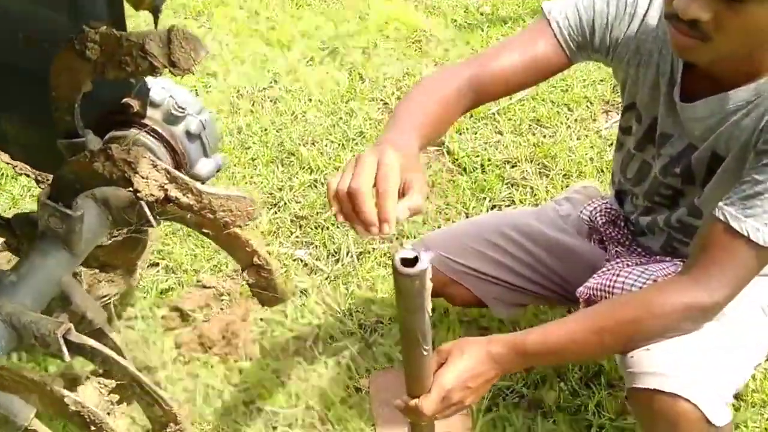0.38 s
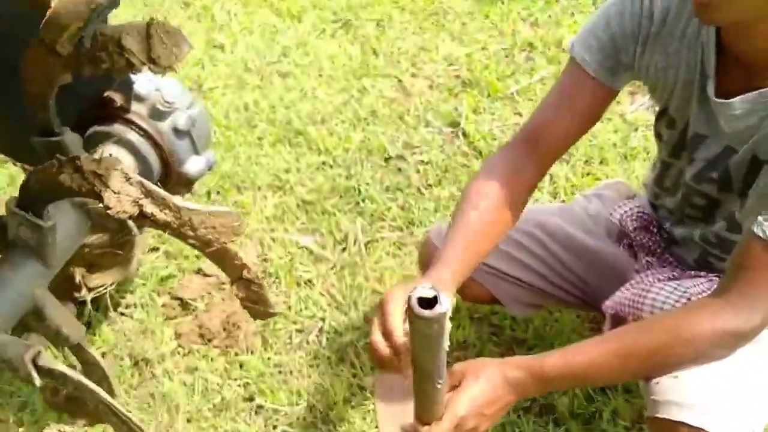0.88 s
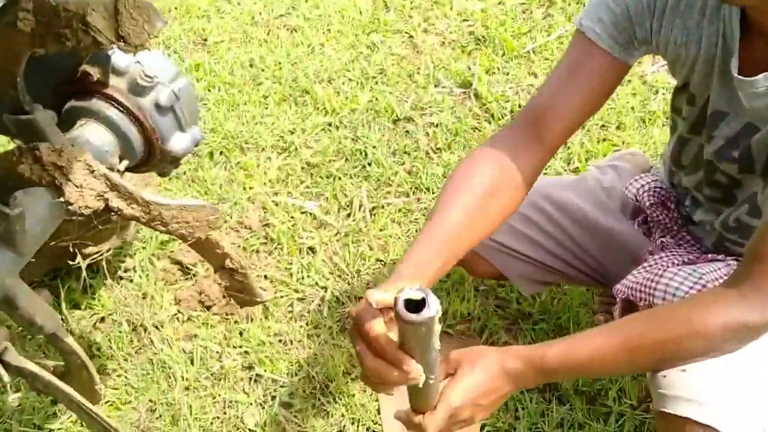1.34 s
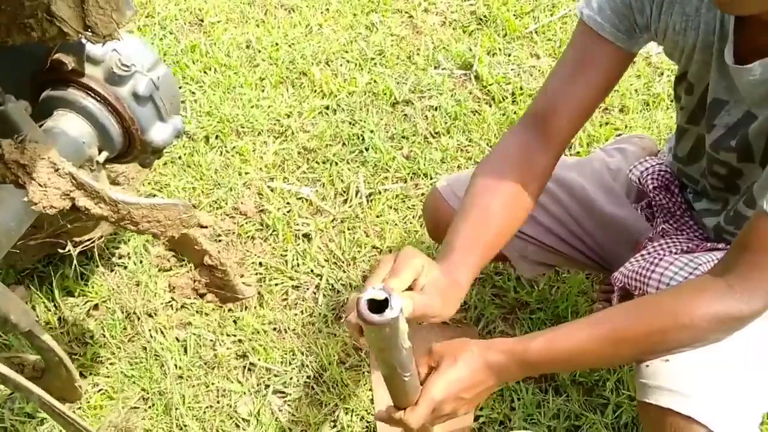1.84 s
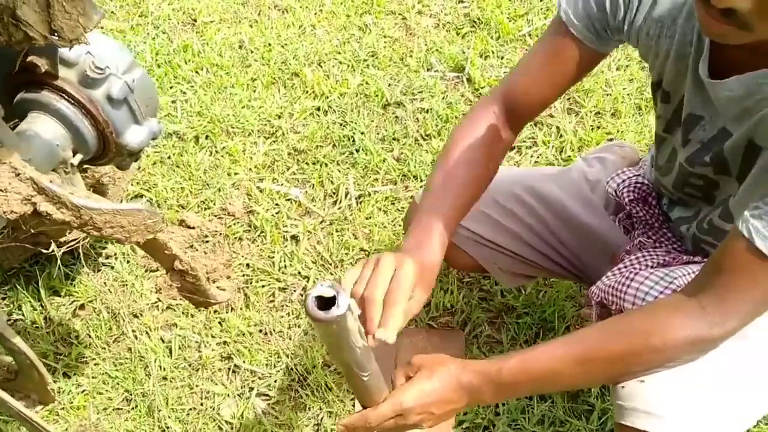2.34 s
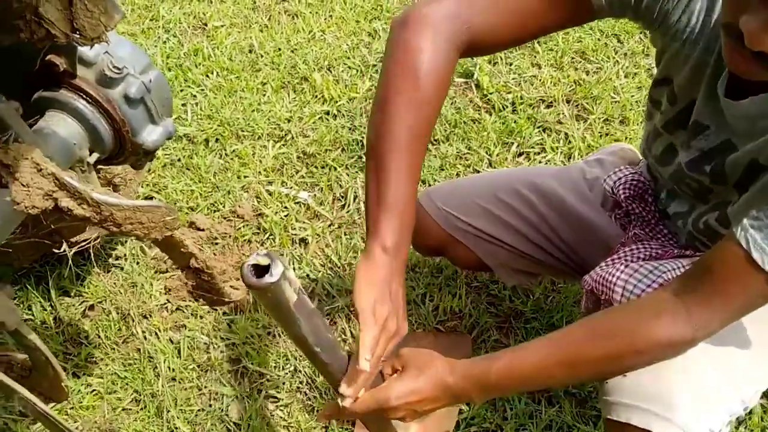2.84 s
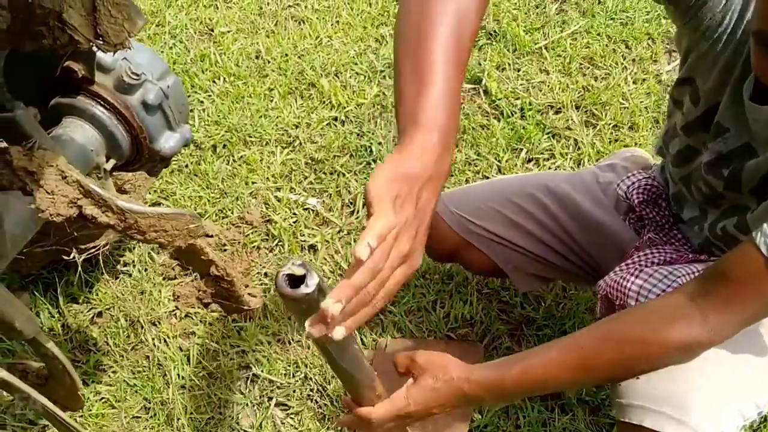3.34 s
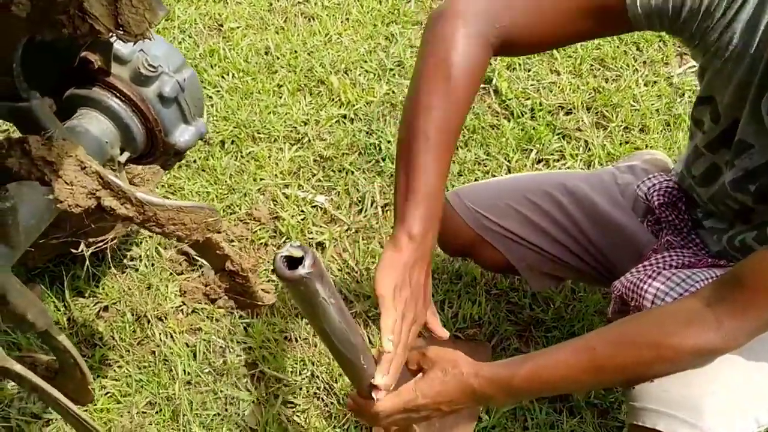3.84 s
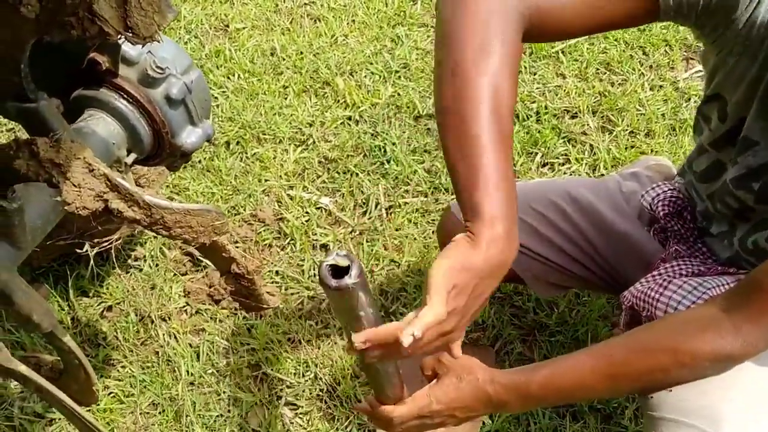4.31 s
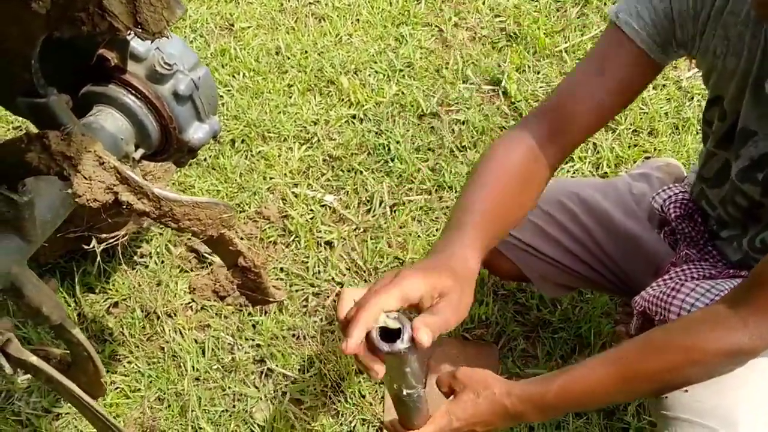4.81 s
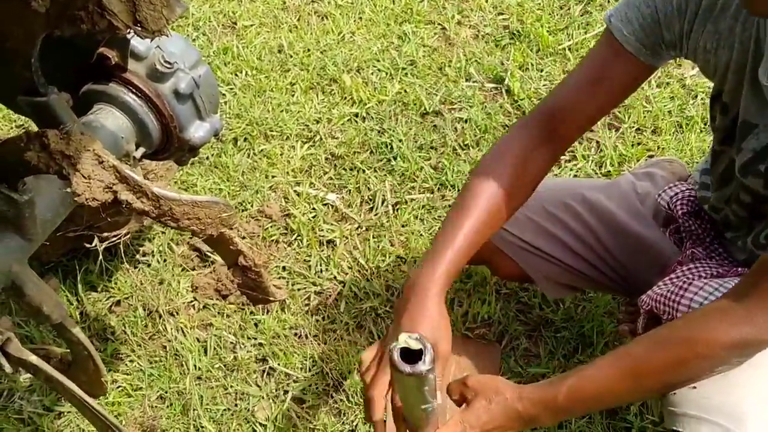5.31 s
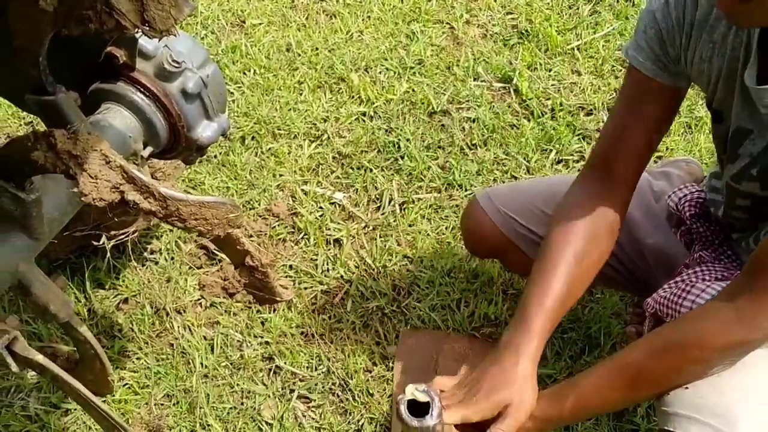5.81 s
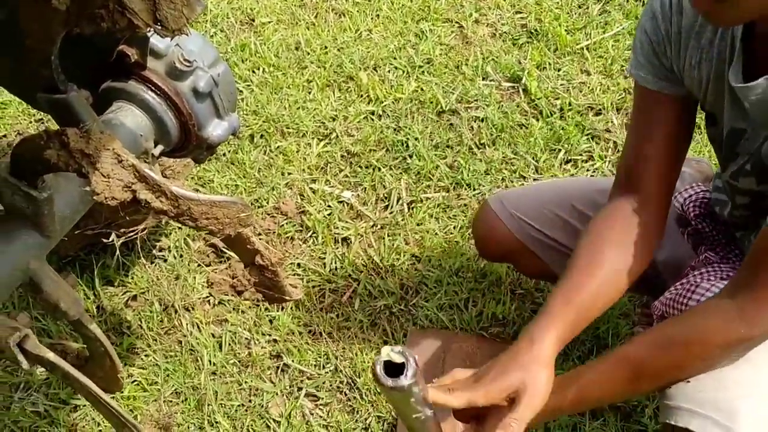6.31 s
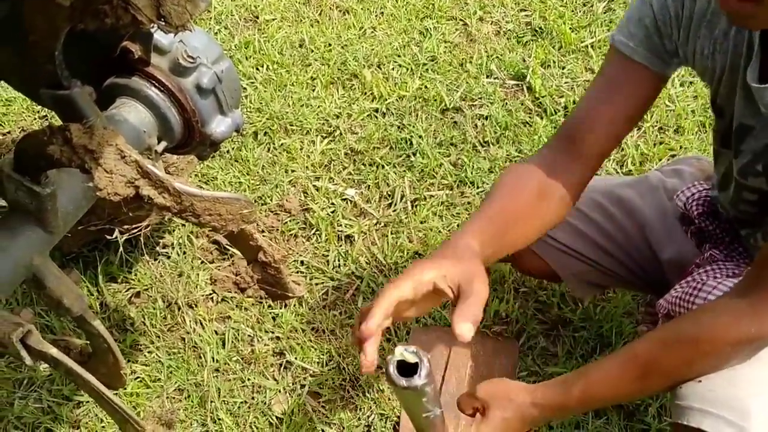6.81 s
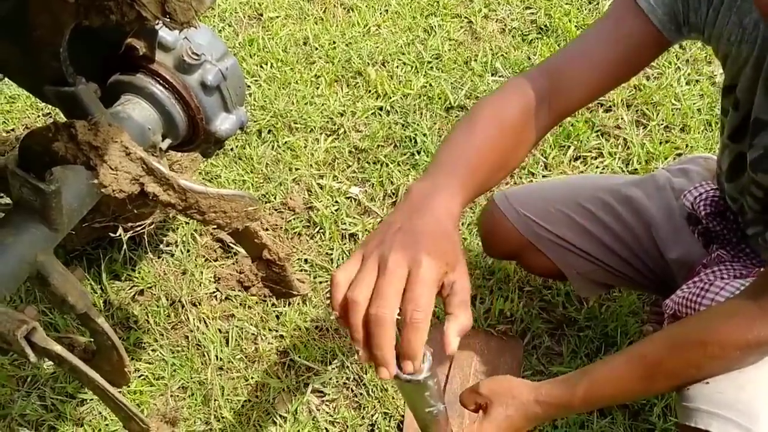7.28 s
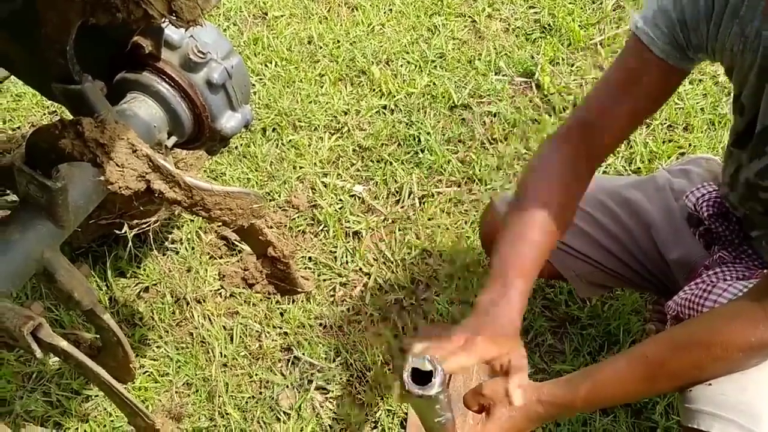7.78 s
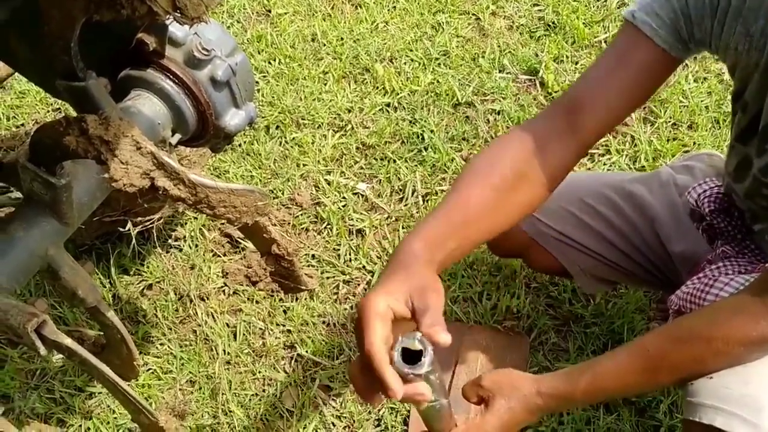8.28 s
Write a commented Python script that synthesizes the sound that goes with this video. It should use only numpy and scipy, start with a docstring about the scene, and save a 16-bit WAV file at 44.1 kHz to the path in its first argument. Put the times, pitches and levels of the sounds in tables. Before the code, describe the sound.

Close outdoor microphone, quiet air with slight low rumble and no room echo. Hand strokes rasp along a steel pipe, hollow and ringing in the middle range, about two per second at first. Several hard, thumping knocks arrive in quick succession just after two seconds, then the scraping softens, pauses and returns late. Triple cricket chirps, around seven kilohertz, continue throughout and grow slightly louder, with soft rustles and faint bird calls.

```python
"""Crickets and a scraped pipe

Outdoors on grass, crickets chirp in threes as gliding near-sines, over a far chorus of scattered strokes,
a buzzing insect of falling pulses and filtered noise for air, low rumble and rustling grass. Friction noise
rings the resonances of a steel pipe scraped in strokes. A few dull knocks close by are snaps and sinking
thumps, ticks are resonant bursts, and a far bird's whistles and faint hoots are sines that fall onto a note."""
import sys
import numpy as np
from scipy import signal
from scipy.io import wavfile
from scipy.ndimage import uniform_filter1d

SR = 44100
rng = np.random.default_rng(int(sys.argv[2]) if len(sys.argv) > 2 else 0)


def natural_amplitude(level_db):
    """Convert a level in decibels to a linear amplitude factor, elementwise."""
    exponent = np.asarray(level_db, float) / 20
    return 10 ** exponent


def log_audio(samples):
    """Write samples as a 16-bit WAV file to the path given in sys.argv[1]."""
    # one column per channel
    frames = np.atleast_2d(samples).T
    # limit to full scale, then quantise
    limited = np.clip(frames, -1, 1)
    pcm = np.round(limited * 32767).astype(np.int16)
    wavfile.write(sys.argv[1], SR, pcm)


N = 381465  # length in samples

# Steady air. Each row: frequency in Hz, relative density in dB per Hz.
AIR_COLOUR = [(30, -30), (79, -12), (115, -0.5), (300, -3.5), (684, -11), (1500, -12.5), (2750, -10),
              (3700, -16.5), (4400, -26), (5600, -16.5), (7100, -13), (10800, -29.5), (13400, -27.5),
              (14400, -36), (16000, -42)]
AIR_DB = -58.5  # rms before the bass cut
# Low rumble. Each row: time in seconds, rms before the bass cut in dB.
RUMBLE_LEVEL = [(0, -65), (0.7, -62.5), (2.3, -61.5), (2.46, -52), (2.6, -59), (3.3, -63.5), (4.17, -66),
                (4.41, -63), (7.7, -63.5), (8, -60.5), (8.65, -60.5)]
# One wing stroke, before tuning and stretching.
# Each row: time from its peak in ms, pitch in Hz, height from 0 to 1.
WING_STROKE = [(-6.5, 7400, 0), (-3.5, 7350, 0.32), (-3, 7320, 0.59), (0.5, 7250, 0.96), (2.5, 6980, 0.7),
               (4.8, 6750, 0.6), (6, 6500, 0.14), (9.5, 6150, 0.02)]
# Far crickets, too many to count. Each row: time in seconds, rms in dB.
CHORUS_LEVEL = [(0, -58), (0.8, -60), (1.54, -58), (1.88, -62), (2.1, -58), (2.4, -62), (2.96, -57.5),
                (3.25, -62), (3.42, -56), (3.64, -60), (5.5, -60), (6.24, -55), (6.7, -59), (6.94, -57),
                (7.3, -60), (8.1, -54.5), (8.43, -58), (8.65, -54)]
# The nearest cricket, three wing strokes a chirp. Each row: time of the last stroke in seconds,
# its peak in dB, time of the opening stroke in seconds, its peak in dB.
NEAR_CHIRPS = [(0.236, -35, 0.1793, -38), (0.705, -35, 0.6471, -40), (1.102, -34, 1.0515, -44),
               (1.5117, -35, 1.4515, -41), (1.9927, -31, 1.936, -35), (2.458, -33.5, 2.4117, -44.5),
               (2.91, -34.5, 2.853, -37.5), (3.4086, -32, 3.351, -35), (3.8809, -33, 3.825, -37.5),
               (4.3444, -33, 4.2882, -37.5), (4.822, -32, 4.7647, -38.5), (5.2254, -31, 5.168, -36.5),
               (5.6833, -32, 5.6257, -37.5), (6.1444, -31, 6.089, -38), (6.6139, -28.5, 6.5574, -33),
               (7.0707, -30.5, 7.0165, -36), (7.5358, -29.5, 7.4793, -34), (7.9877, -28, 7.932, -35),
               (8.4227, -29.5, 8.3658, -35)]
STROKE_GAP_S, MIDDLE_DB = .0292, -.8  # the middle stroke: its lead on the last, its level relative to it
# Single strokes of neighbouring crickets that stand out. Each row: time in seconds, peak in dB.
NEIGHBOUR_STROKES = [(0.046, -46), (0.274, -45), (0.7236, -45), (0.8188, -47), (1.155, -47), (1.687, -46),
                     (2.3394, -43.5), (2.5797, -44.5), (2.6767, -46), (3.0771, -44.5), (3.265, -45),
                     (3.5487, -45), (3.9191, -41), (3.9543, -44.5), (4.271, -46), (4.6774, -45),
                     (4.9887, -45), (5.0035, -44.5), (5.2453, -39), (5.2845, -45), (5.5772, -46.5),
                     (5.7574, -46.5), (5.949, -45), (5.9797, -44.5), (6.3305, -43), (6.363, -44),
                     (6.3929, -46.5), (6.4712, -44.5), (6.6766, -44.5), (6.6907, -42), (6.7173, -44),
                     (6.888, -45), (7.3914, -47), (7.426, -46), (7.4569, -39.5), (7.5728, -45.5),
                     (7.8345, -45.5), (7.8645, -43), (7.9152, -44), (8.1909, -41), (8.221, -36),
                     (8.4808, -46), (8.5001, -40.5), (8.5326, -40.5), (8.5721, -44)]
# Scraping strokes on the pipe. Each row: start in seconds, fastest moment in seconds, end in seconds,
# rms when fastest in dB, brightness when fastest in dB per 1500 Hz (upper over lower resonances).
SCRAPES = [(-0.08, 0.17, 0.3, -49, 5), (0.49, 0.72, 0.9, -47.5, 5), (1.03, 1.31, 1.5, -45.5, 4),
           (1.66, 1.97, 2.11, -48.5, 6), (2.17, 2.5, 2.74, -51, 5), (2.6, 3.06, 3.17, -54, 1),
           (3.2, 3.46, 3.58, -53.5, -1), (3.64, 3.92, 4.04, -52, 3), (4.13, 4.35, 4.43, -51.5, 1),
           (4.56, 4.77, 4.87, -53.5, 1), (4.93, 5.23, 5.32, -51.5, -1), (6.4, 6.63, 6.76, -50, 2),
           (7, 7.05, 7.11, -62, -3), (7.3, 7.54, 7.65, -50.5, 5), (7.8, 7.95, 8.01, -64, -10),
           (8.32, 8.59, 8.8, -47.5, 9)]
EDGE_DB, REST_DB = -23, -75  # level at a stroke's ends relative to its height, level between strokes
RISE_BEND, FALL_BEND = 1.9, 2.3  # exponents that curve a stroke's flanks
DULL_DB = -6  # brightness while the hand is still slow, dB per 1500 Hz
# Air column and wall of the pipe.
# Each row: resonance in Hz, width in Hz, relative level before tilting in dB.
PIPE_MODES = [(1850, 404, -7.5), (2170, 300, -3), (2644, 230, -1), (2930, 320, -5), (3395, 307, -1.5),
              (3800, 270, -16)]
# Hiss of grass and cloth. Each row: frequency in Hz, relative density in dB per Hz.
HISS_COLOUR = [(3500, -30), (4800, -12), (6000, -8), (8200, 3), (9600, -2.5), (10600, -14.5), (13000, -22),
               (16000, -35)]
# Crisper top of the rustling. Each row: frequency in Hz, relative density in dB per Hz.
CRISP_COLOUR = [(6000, -32), (8500, -11), (11500, -9), (13700, -5), (14300, 3), (15600, -2), (16200, -13)]
# Rustles of grass and cloth. Each row: time of its height in seconds, half length in seconds,
# rms of the hiss near 9 kHz in dB, rms of the crisper top in dB.
RUSTLE_SURGES = [(0.14, .08, -63, -75), (0.36, .05, -68, -78), (0.7, .08, -57, -67), (0.85, .04, -63, -79),
                 (1.17, .05, -70, -77), (1.58, .05, -70, -76), (1.98, .02, -64, -85),
                 (2.07, .015, -62, -68), (2.19, .03, -59, -67), (2.375, .02, -65, -63),
                 (2.5, .06, -63, -70), (2.68, .045, -56, -55), (2.8, .09, -62, -66), (2.91, .03, -60, -72),
                 (3.02, .07, -64, -67), (3.11, .03, -65, -71), (3.3, .03, -64, -67), (3.41, .06, -59, -67),
                 (4.04, .05, -66, -71), (4.21, .02, -66, -76), (4.31, .04, -65, -82), (4.82, .05, -63, -82),
                 (4.99, .05, -67, -73), (5.18, .03, -63, -78), (5.42, .1, -62, -67), (6.03, .05, -57, -66),
                 (6.25, .035, -59, -66), (6.63, .06, -61, -78), (6.82, .02, -70, -74),
                 (7.06, .03, -63, -85), (7.56, .07, -64, -79), (7.73, .04, -63, -81), (7.93, .05, -59, -78),
                 (8.45, .04, -64, -80), (8.6, .07, -64, -80)]
STIR_HISS_DB, STIR_CRISP_DB = -66, -77.5  # mid levels of grass stirring between the rustles
# Faint low hoots. Each row: start in seconds, length in seconds, nominal first pitch in Hz, level in dB.
HOOT_CALLS = [(0, .04, 990, -70), (.145, .1, 990, -69), (.268, .024, 1030, -66.5), (.41, .04, 1150, -68.5),
              (5.765, .02, 1420, -69), (5.785, .018, 1100, -66.5), (5.85, .04, 1130, -63.5),
              (5.925, .047, 1220, -62.5)]
# Shared fall of the hoots: resting note in Hz, fall in Hz per second, rounding in Hz.
HOOT_FALL = 990, 11000, 40
# Falling whistles of a far bird.
# Each row: start in seconds, length in seconds, nominal first pitch in Hz, level in dB.
WHISTLE_CALLS = [(3.81, .11, 2750, -61), (4.07, .135, 3850, -66), (4.25, .14, 2750, -61),
                 (4.495, .135, 3900, -65), (4.67, .135, 2900, -57.5)]
# Shared fall of the whistles: resting note in Hz, fall in Hz per second, rounding in Hz.
WHISTLE_FALL = 2060, 19500, 290
# Evenly spaced runs of a lower insect.
# Each row: first buzz in seconds, last buzz in seconds, reference level in dB.
BUZZES = [(0.097, 0.188, -64.5), (0.53, 0.969, -64), (1.489, 1.964, -62), (2.536, 2.995, -64),
          (3.485, 3.97, -64), (4.362, 4.748, -63.5), (5.255, 5.531, -63.5), (5.919, 6.011, -64.5),
          (6.622, 6.913, -63), (7.35, 7.615, -63.5), (8.134, 8.61, -63)]
BUZZ_GAP_S, BUZZ_SPREAD_DB = .093, 1.5  # approximate spacing, standard deviation from buzz to buzz
# Small ticks and chips.
# Each row: time in seconds, peak in dB, resonance in Hz, decay of the burst in ms.
TICK_BURSTS = [(.374, -49.5, 2580, 8.6), (2.0728, -40, 1210, 1.3), (2.207, -38, 1310, 1.5),
               (2.2132, -32, 1620, 1.5), (2.218, -36, 3260, 1.6), (2.6358, -37, 1280, 0.91),
               (3.1416, -38, 8400, 1.3), (3.1416, -46, 14000, .6), (5.012, -52, 2200, 9.7),
               (5.168, -42, 11000, .5), (2.6348, -42, 3000, .8)]
# Knocks. Each row: time in seconds, snap level in dB, snap width in ms, thump level in dB,
# last pitch of the thump in Hz.
KNOCK_BLOWS = [(1.436, -61.5, .3, -49.5, 150), (1.666, -46, 0.32, -40.5, 248),
               (2.0784, -16.5, 0.15, -21, 105), (2.1732, -11, .14, -18, 101),
               (2.1932, -15, .15, -20.5, 100), (2.2116, -17, 0.15, -19, 101), (2.323, -17, 0.16, -20, 110),
               (2.3854, -42, 0.14, -35, 140), (2.4671, -21, 0.2, -18, 111), (2.635, -38.5, 0.13, -41, 119)]


def evened(x):
    """Normalisation of a signal to rms 1."""
    return x / np.sqrt(np.mean(x ** 2) + 1e-20)


def curve(rows, t):
    """Linear interpolation of a table's columns at times t."""
    s, *columns = np.transpose(rows)
    return [np.interp(t, s, c) for c in columns]


def add(mix, s, sound):
    """Superposition of a sound on the mix from time s."""
    part = mix[max(round(s * SR), 0):][:len(sound)]
    part += sound[:len(part)]


def drift(size):
    """Twice-averaged noise: slow random variation of rms 1; size in samples."""
    return evened(uniform_filter1d(uniform_filter1d(rng.standard_normal(N), size), size))


def resonate(x, hz, width):
    """Heterodyne resonance of gain 1: shift the pitch curve hz to zero, smooth, and shift back."""
    turn = np.exp(2j * np.pi * np.cumsum(hz * np.ones(len(x))) / SR)
    r = np.exp(-np.pi * width / SR)
    return 2 * (turn * signal.lfilter([1 - r], [1, -r], x / turn)).real


def noise(points, patchy_db):
    """Coloured noise from random short-time spectra, with patches that drift over time and frequency."""
    frames, hz = N // 128 + 5, np.fft.rfftfreq(512, 1 / SR)
    a, b, patches = rng.standard_normal((frames, 257, 3)).T
    patches = evened(uniform_filter1d(uniform_filter1d(patches, 8, 0), 16, 1))
    f, db = np.transpose(points)
    colour = np.interp(np.log(hz + 1), np.log(f), db)[:, None]
    spectra = (a + 1j * b) * natural_amplitude(colour + patchy_db * patches)
    return evened(signal.istft(spectra, nperseg=512, noverlap=384)[1][:N])


def field(x, t60):
    """Scattering by grass and machinery: sparse echoes of random sign that fall 60 dB in t60 seconds."""
    at = np.arange(100, 8000, 20) + rng.integers(0, 20, 395)
    taps = np.zeros(8020)
    taps[at] = rng.choice([-1., 1.], 395) * natural_amplitude(-60 * at / SR / t60)
    return signal.oaconvolve(x, taps / np.linalg.norm(taps))[:N]


def air():
    """Broadband noise as steady air, and twice-resonated noise as a wavering low rumble."""
    low = resonate(resonate(rng.standard_normal(N), 114, 64), 137, 164)
    rumble = evened(low) * natural_amplitude(curve(RUMBLE_LEVEL, np.arange(N) / SR)[0])
    steady = natural_amplitude(AIR_DB) * noise(AIR_COLOUR, 1.53) + rumble
    # hardly any deep bass
    return signal.sosfilt(signal.butter(5, 74, "high", fs=SR, output="sos"), steady)


def stroke(tune, slow, lift_hz=0):
    """Frequency glide of one wing stroke: a near-sine swells and falls in pitch, a little uneven."""
    ms = np.arange(WING_STROKE[0][0], WING_STROKE[-1][0], 1000 / SR / slow)
    hz, height = curve(WING_STROKE, ms)
    uneven = 1 + .12 * evened(uniform_filter1d(rng.standard_normal(len(ms)), size=40))
    soft = uniform_filter1d(uniform_filter1d(height * uneven, size=20), size=20)
    turns = np.cumsum(tune * hz + lift_hz) / SR + rng.random()
    return soft * np.sin(2 * np.pi * turns)


def crickets():
    """Superposed wing strokes: near ones one by one, the chorus a dense random scatter blurred by echoes."""
    near, far = np.zeros(N), np.zeros(N)
    strokes = []
    for s, db, first_s, first_db in NEAR_CHIRPS:
        strokes += [(first_s, first_db), (s - STROKE_GAP_S, db + MIDDLE_DB), (s, db)]
    for s, db in strokes + NEIGHBOUR_STROKES:
        sound = natural_amplitude(db) * stroke(1 + 0.0038 * rng.standard_normal(), 1)
        # a faint copy of the stroke, tuned up and 5.8 kHz higher, its level partly following the stroke
        copy_db = 0.47 * db - 48.5 + 2 * rng.standard_normal()
        sound += natural_amplitude(copy_db) * stroke(1.05, 1, lift_hz=5800)
        add(near, s + WING_STROKE[0][0] / 1000, sound)
    for tune in np.linspace(.93, 1.025, 12):
        heights = natural_amplitude(3.7 * np.minimum(rng.exponential(1, N), 2))
        starts = (rng.random(N) < 5 / SR) * heights  # about 5 strokes a second at each tuning
        far += signal.oaconvolve(starts, stroke(tune, rng.uniform(.8, 1.2)))[:N]
    far = evened(far + .95 * field(far, 0.19)) * natural_amplitude(curve(CHORUS_LEVEL, np.arange(N) / SR)[0])
    return near + natural_amplitude(-15) * field(near, 0.25) + far


def hand():
    """Speed of the scraping hand: each stroke gathers slowly, brightening, and stops more quickly."""
    t = np.arange(N) / SR
    power, bright = np.full(N, natural_amplitude(REST_DB) ** 2), np.zeros(N)
    for start, top, end, db, bright_db in SCRAPES:
        before = np.maximum(top - t, 0) / (top - start)
        after = np.maximum(t - top, 0) / (end - top)
        part = natural_amplitude(db + EDGE_DB * (before ** RISE_BEND + after ** FALL_BEND)) ** 2
        power = power + part
        bright = bright + part * (bright_db + (DULL_DB - bright_db) * np.minimum(before, 1))
    return np.sqrt(power), bright / power  # level, and brightness weighted by power


def rub():
    """Friction excitation: uneven grains ring the pipe, and faster sliding favours its upper resonances."""
    level, bright_db = hand()
    grains = rng.standard_normal(N) * natural_amplitude(1.46 * drift(size=100))
    centre_hz = 2900 + 60 * bright_db
    rings = natural_amplitude(-5.5) * evened(resonate(resonate(grains, centre_hz, 550), centre_hz, 800))
    for hz, width, mode_db in PIPE_MODES:
        tilt_db = bright_db * (hz - 2700) / 1500
        share = natural_amplitude(mode_db - 13 + tilt_db + 1.2 * drift(size=1200))
        sliding_hz = hz * (1 + 0.005 * bright_db + 0.025 * drift(size=2500))  # the grip shifts
        ring = evened(resonate(resonate(grains, sliding_hz, width), sliding_hz, 2 * width))
        rings += share * np.sqrt(width / 30) * ring
    rings = signal.sosfilt(signal.butter(5, [1500, 3750], "band", fs=SR, output="sos"), rings)
    # level the running rms so that the hand alone sets the loudness
    return rings / np.sqrt(uniform_filter1d(rings ** 2, size=6000)) * level


def rustle():
    """Modulated noise: bell-shaped surges of hiss and crisp top over grass that stirs unevenly throughout."""
    t = np.arange(N) / SR
    stir = evened(drift(size=2000) + .9 * drift(size=250))
    hiss = natural_amplitude(STIR_HISS_DB + 1.5 * stir) ** 2
    crisp = natural_amplitude(STIR_CRISP_DB + 2.4 * stir) ** 2
    for s, half, hiss_db, crisp_db in RUSTLE_SURGES:
        bell = np.exp(-((t - s) / half) ** 2)
        hiss = hiss + natural_amplitude(hiss_db) ** 2 * bell
        crisp = crisp + natural_amplitude(crisp_db) ** 2 * bell
    return noise(HISS_COLOUR, 1.9) * np.sqrt(hiss) + noise(CRISP_COLOUR, 1.5) * np.sqrt(crisp)


def birds():
    """Frequency glides of far hoots and whistles: sines fall steadily onto a resting note, with echoes."""
    out = np.zeros(N)
    for calls, (note_hz, fall_hz, round_hz) in ((HOOT_CALLS, HOOT_FALL), (WHISTLE_CALLS, WHISTLE_FALL)):
        for s, length, first_hz, db in calls:
            t = np.arange(0, length, 1 / SR)
            hz = note_hz + round_hz * np.logaddexp(0, (first_hz - note_hz - fall_hz * t) / round_hz)
            waver_db = 3 * evened(uniform_filter1d(rng.standard_normal(len(t)), size=350))  # moving air
            tone = np.sqrt(2) * np.sin(2 * np.pi * np.cumsum(hz) / SR)
            add(out, s, natural_amplitude(db + waver_db) * tone * signal.windows.tukey(len(t), .3))
    return out + natural_amplitude(-6) * field(out, 0.12)


def buzzes():
    """Pulse trains: each buzz is three falling pulses, each set lower, uneven and half lost in echoes."""
    t, out = np.arange(300) / SR, np.zeros(N)
    for first, last, run_db in BUZZES:
        for s in np.linspace(first, last, round((last - first) / BUZZ_GAP_S) + 1):
            pulse_phase, pulse_level = rng.standard_normal((2, 3))
            buzz_pitch, buzz_level = rng.standard_normal(2)
            db = run_db + BUZZ_SPREAD_DB * buzz_level
            for k in range(3):
                hz = 5600 + 70 * buzz_pitch - 140 * k - 70000 * t
                pulse = np.hanning(300) * np.sin(2 * np.pi * np.cumsum(hz) / SR + 3 * pulse_phase[k])
                pulse_db = db + 2.5 - 1.9 * k + 1.8 * pulse_level[k]
                add(out, s - .012 + .0125 * k, natural_amplitude(pulse_db) * pulse)
    return out + natural_amplitude(-3.5) * field(out, .08)


def ticks():
    """Impulsive excitation of one resonance: a dying noise burst, filtered twice, is a small tick or chip."""
    out, t = np.zeros(N), np.arange(2000) / SR
    for s, db, hz, ms in TICK_BURSTS:
        ring = rng.standard_normal(len(t)) * np.exp(-t * 1000 / ms)
        ring = resonate(resonate(ring, hz, 0.42 * hz / ms), hz, .8 * hz / ms)
        add(out, s, natural_amplitude(db) * ring / abs(ring).max())
    return out


def knocks():
    """Impact: a sharp to-and-fro snap with a hard crack, then a thump whose pitch sinks as it dies."""
    out, t = np.zeros(N), np.arange(-100, 3500) / SR
    after = np.maximum(t, 0)
    for s, snap_db, ms, thump_db, hz in KNOCK_BLOWS:
        u = t * 1000 / ms  # time in snap widths
        snap = -u * np.exp(.5 - u ** 2 / 2)
        crack = rng.standard_normal(len(t)) * (t > 0) * np.exp(-after / 0.0012)
        snap += natural_amplitude(-31) * crack
        snap += natural_amplitude(-16) * resonate(crack, 3100, 870) + natural_amplitude(-8.5) * resonate(crack, 1600, 600)
        turns = hz * after + 0.56 * (1 - np.exp(-after / 0.0029))
        onset = 1 / (1 + np.exp(np.clip(.6 - 2.5 * u, -50, 50)))
        thump = -np.cos(2 * np.pi * turns) * np.exp(-after / 0.0078) * onset
        add(out, s + t[0], natural_amplitude(snap_db) * snap + natural_amplitude(thump_db) * thump)
    return out


def scene():
    """Superposition of all sources at one microphone."""
    background = air() + crickets()
    return (background + rub() + rustle() + birds() + buzzes() + ticks() + knocks())[None]


def roll_off(x):
    """The treble ends steeply here."""
    return signal.sosfilt(signal.butter(12, 16500, fs=SR, output="sos"), x)


def record(dry):
    """Band limiting: the microphone drops the deepest bass and ends below 16 kHz."""
    cut = signal.sosfilt(signal.butter(2, 42, "high", fs=SR, output="sos"), dry)
    treble_cut = signal.firwin(255, 15700, window=("kaiser", 7), fs=SR)
    cut = signal.oaconvolve(cut, treble_cut[None], "same")
    return roll_off(cut)


dry = scene()
out = record(dry)
log_audio(out)
```